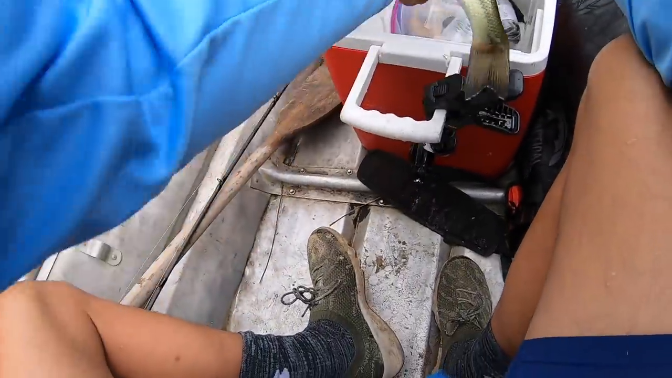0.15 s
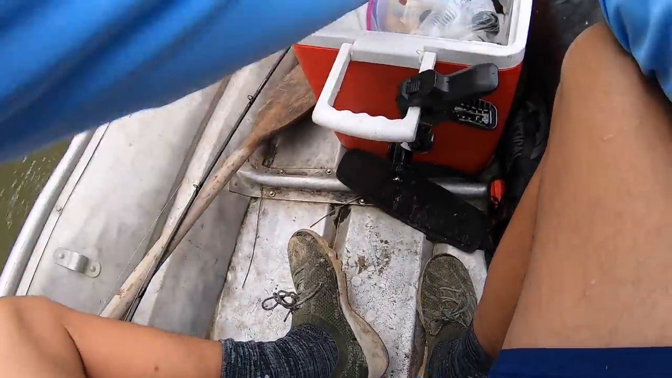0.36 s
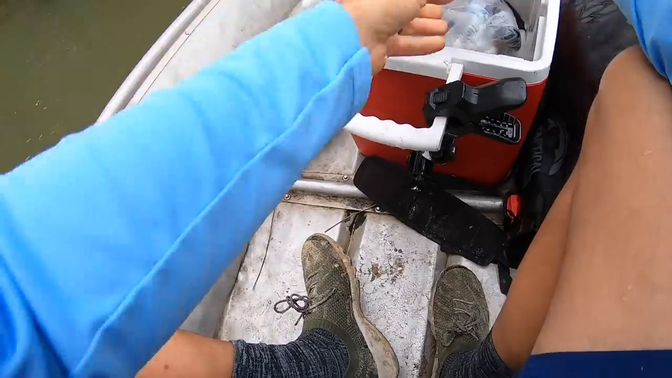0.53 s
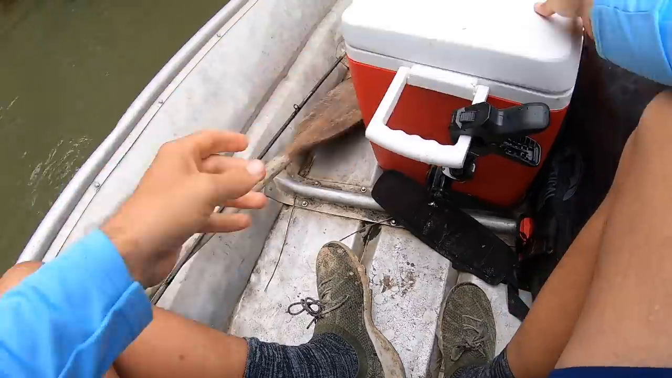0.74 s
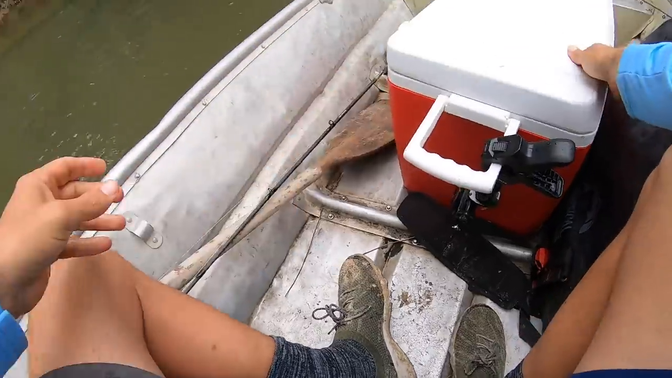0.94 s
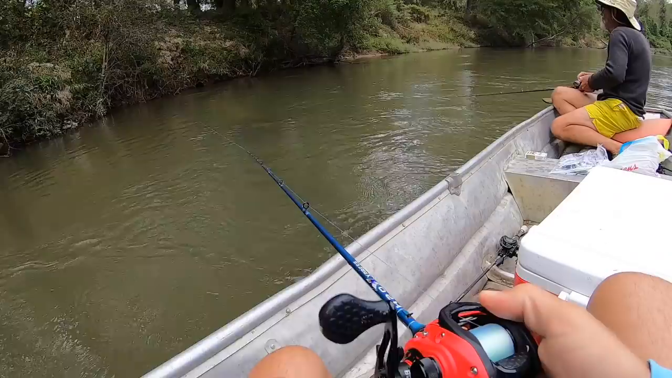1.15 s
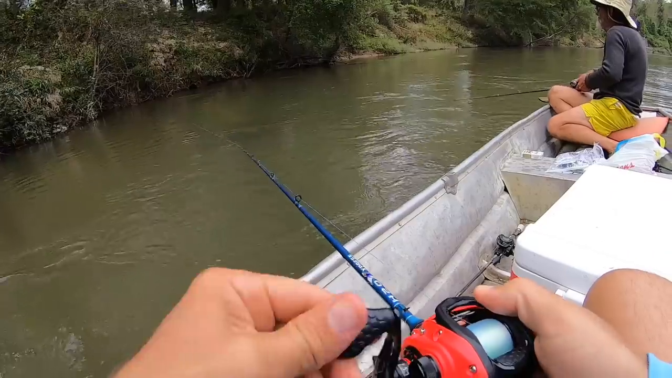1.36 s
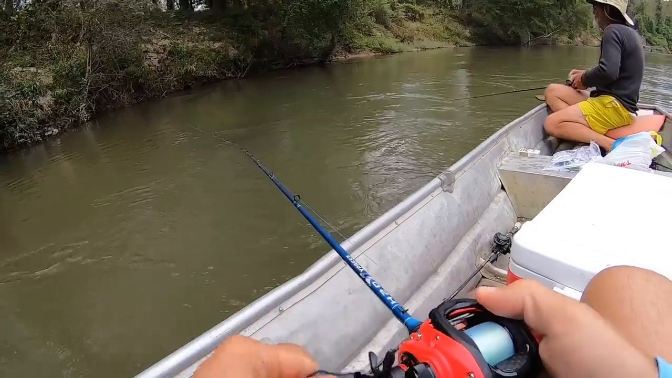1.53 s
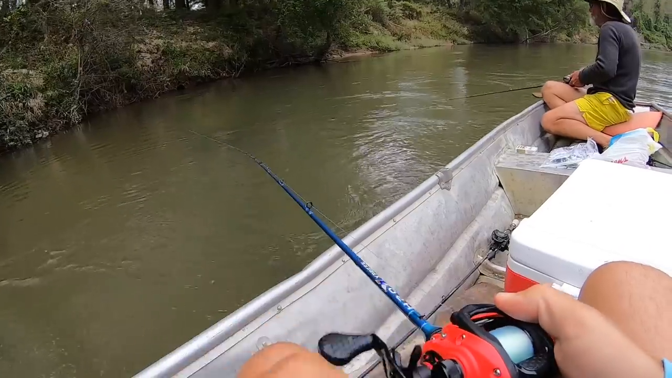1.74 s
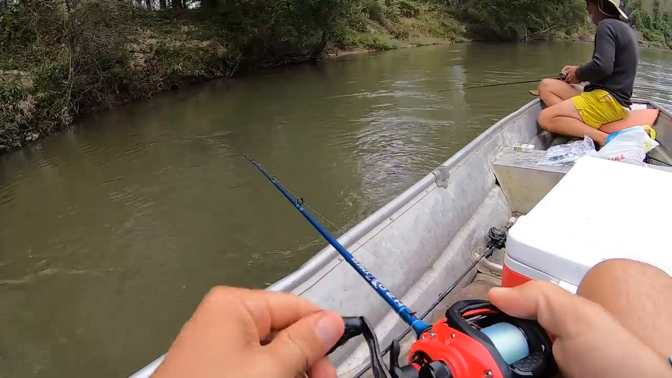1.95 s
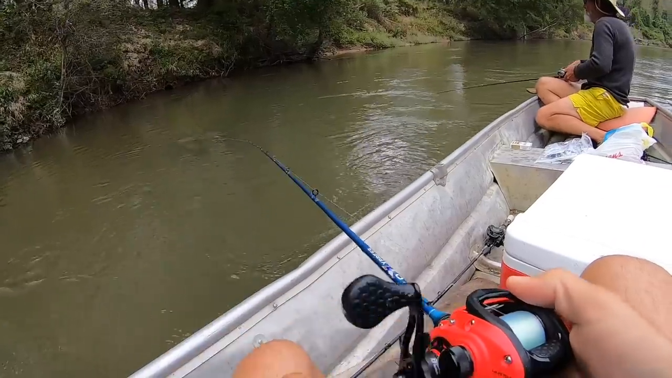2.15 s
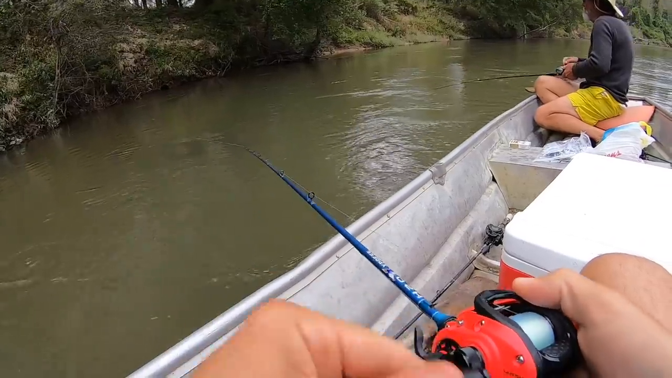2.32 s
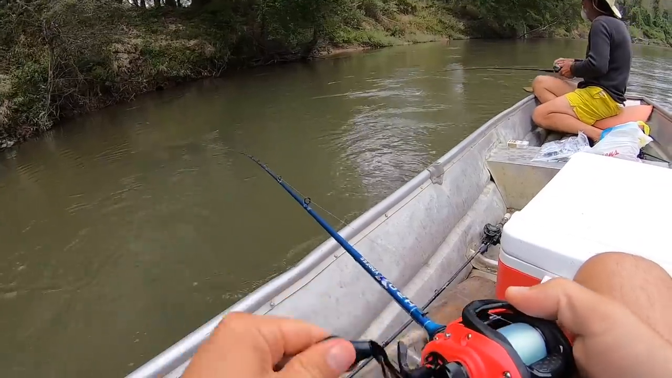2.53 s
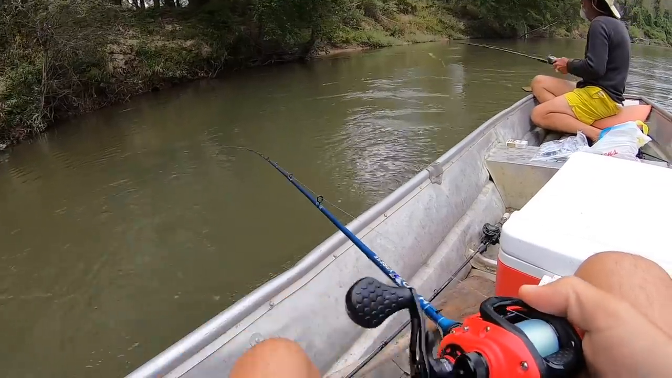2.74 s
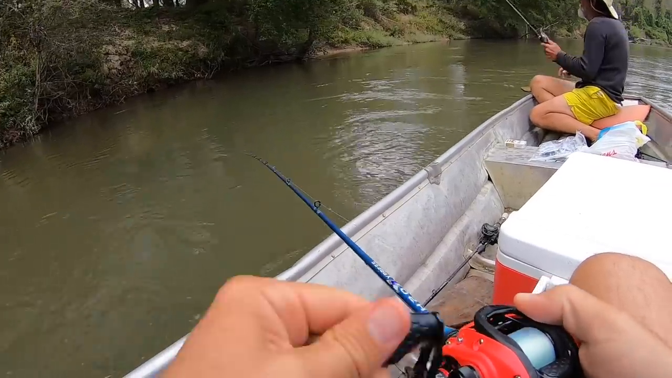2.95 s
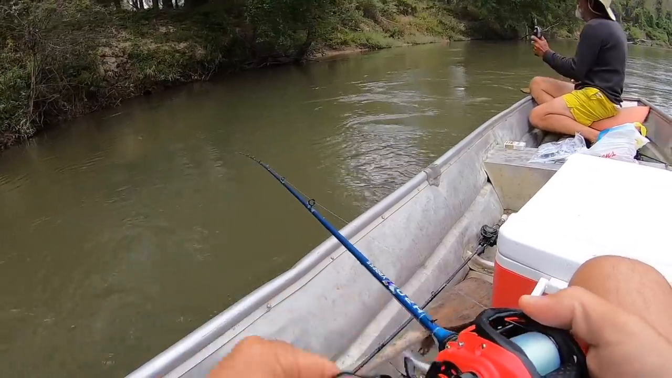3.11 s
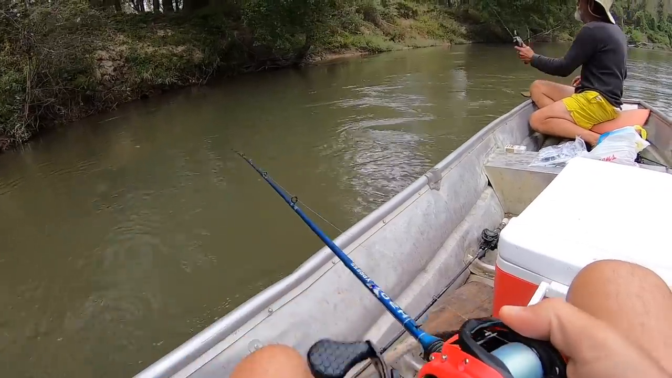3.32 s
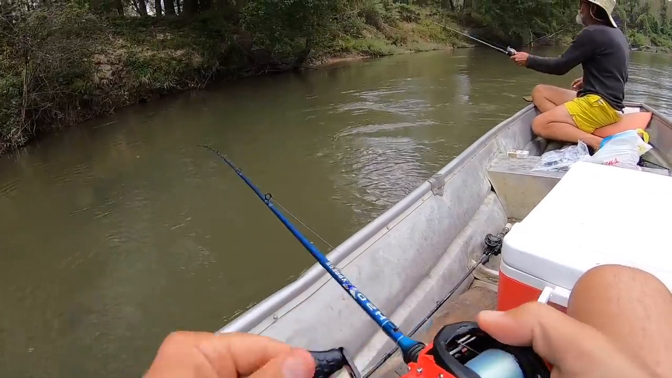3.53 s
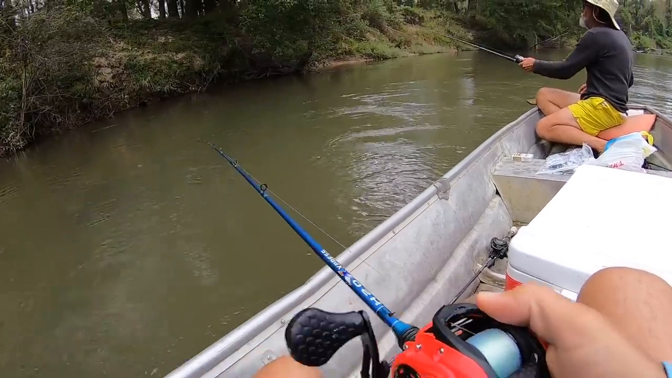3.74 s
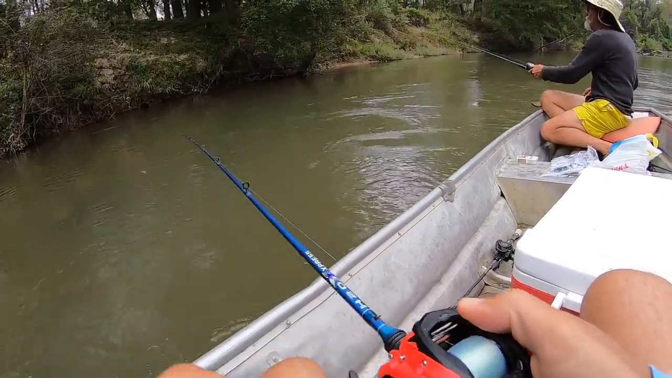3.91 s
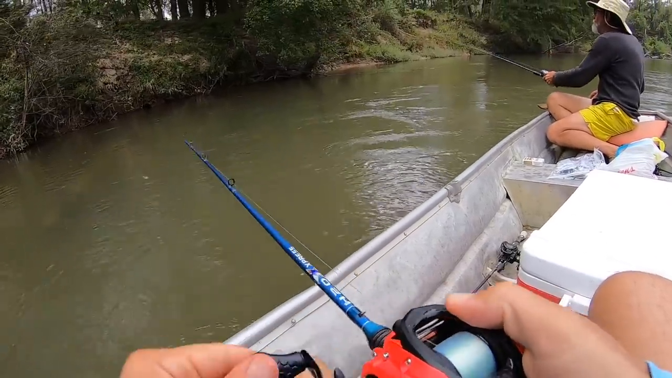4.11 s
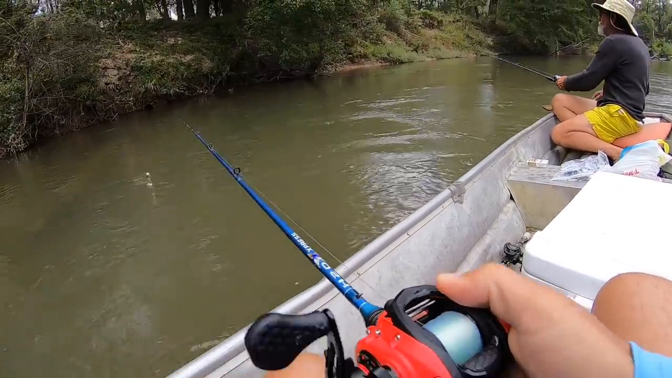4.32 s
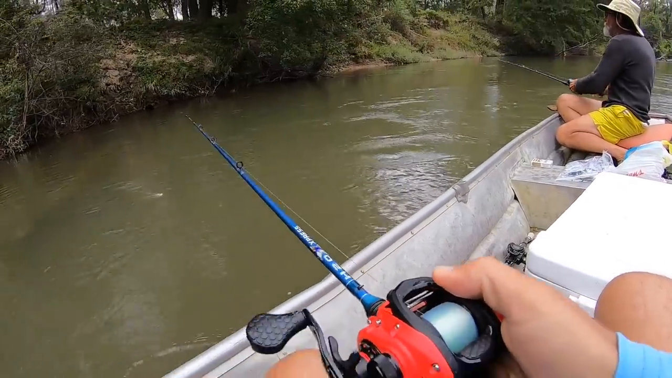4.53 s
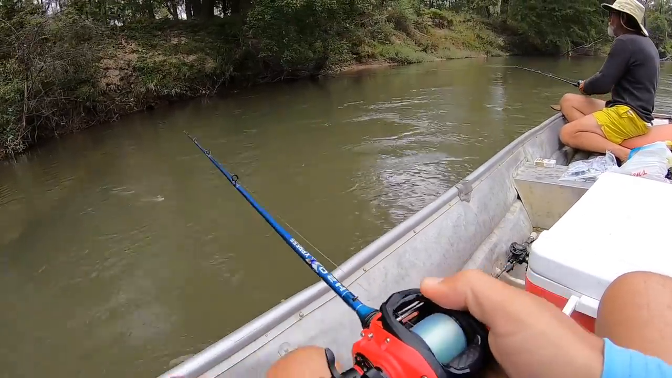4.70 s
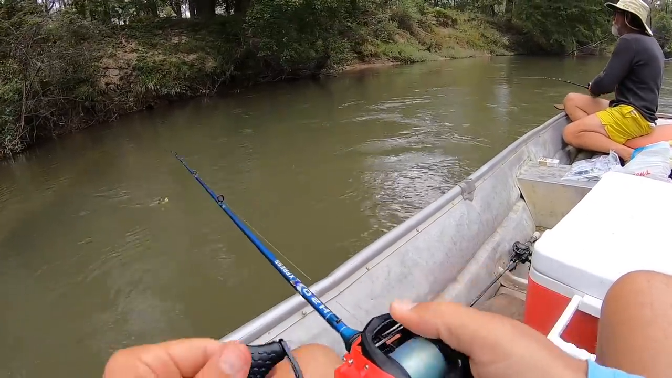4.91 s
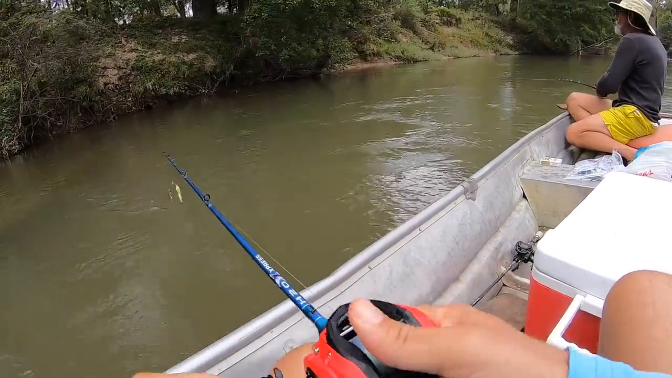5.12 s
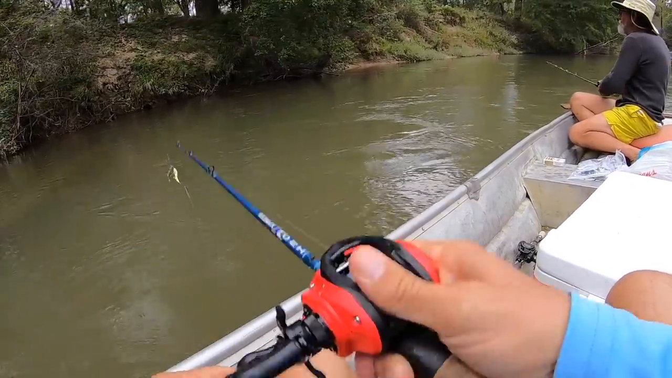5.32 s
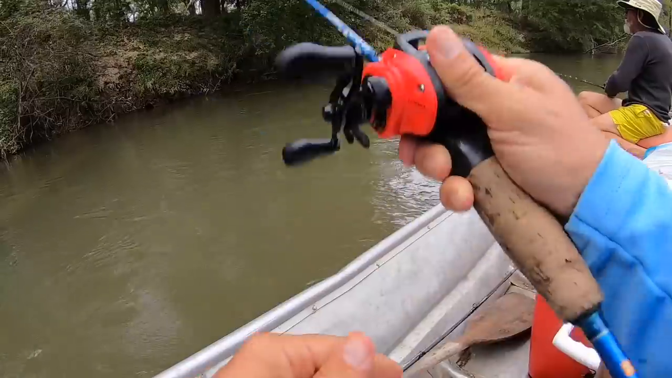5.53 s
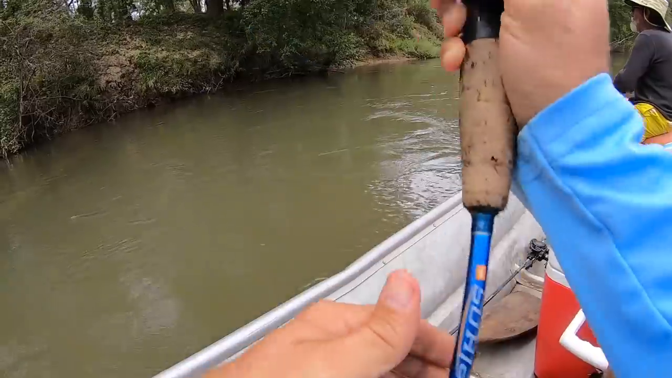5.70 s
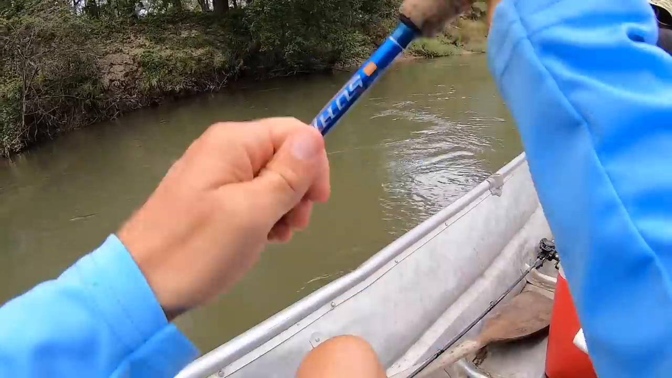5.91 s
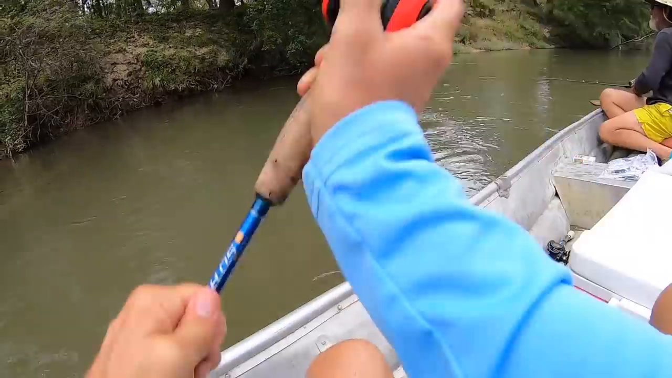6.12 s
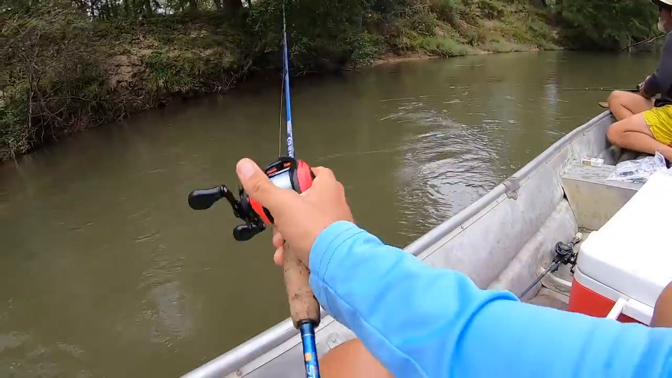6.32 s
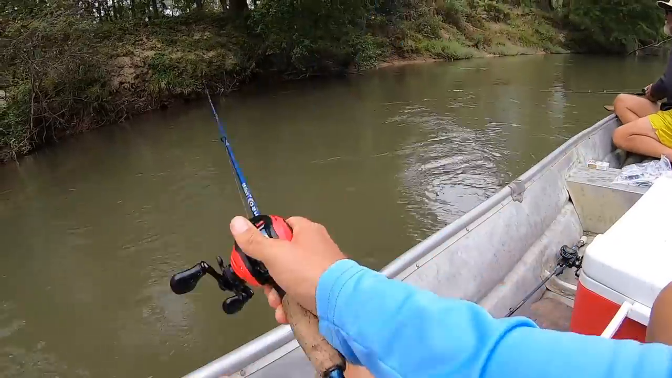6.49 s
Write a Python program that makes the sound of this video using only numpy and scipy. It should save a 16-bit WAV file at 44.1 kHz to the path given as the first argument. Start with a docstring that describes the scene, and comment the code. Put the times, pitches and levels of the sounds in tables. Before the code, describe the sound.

Close to the microphone in a small metal boat, a hollow cooler is bumped, then pounded in a loud, low, rattling flurry with crunching ice. It cuts off abruptly. Quiet outdoor air follows: a soft reel whirr with small ticks, a throbbing shrill insect, faint hum and low drone. Little drips come off the lure, then a sharp reel click, cloth swishes and low wind buffets.

```python
"""Fish in a cooler, then a fishing reel

A fish thrashes in a plastic cooler in a small metal boat: dying tones ring the box, noise bursts are its load.
The scene cuts from the cooler to an angler winding a reel of coloured noise, ticks and small metal rings.
The lure drips gliding sines, cloth swishes as swelling noise, and an insect buzzes as throbbing noise.
Behind them lie wind, air and far insects made of noise, with a thin hum and a low drone made of sines.
"""
import sys
import numpy as np
from scipy import signal
from scipy.fft import rfft, irfft, next_fast_len
from scipy.io import wavfile
from scipy.ndimage import uniform_filter1d

SR = 44100
rng = np.random.default_rng(int(sys.argv[2]) if len(sys.argv) > 2 else 0)


def dump_mix(stems):
    """Bounce the given channels to the path in sys.argv[1] as a 16-bit WAV at rate SR."""
    frames = np.atleast_2d(stems).T  # one column per channel
    limited = np.clip(frames, -1, 1)  # hard clip at full scale
    pcm = np.round(limited * 32767).astype(np.int16)
    wavfile.write(sys.argv[1], SR, pcm)


N = 289075  # length of the sound [samples]


def amp(db):
    """Turns decibels into a gain."""
    return 10 ** (np.asarray(db) / 20)


def evened(x):
    """Scales a signal to an average strength (rms) of 1."""
    return x / np.sqrt(np.mean(x ** 2) + 1e-20)


def smoothed_noise(count, size):
    """Noise averaged over `size` samples so that it changes more slowly, with rms 1."""
    return evened(uniform_filter1d(rng.standard_normal(count), size=size))


def wander(size):
    """A slow random curve with rms 1, smoothed twice."""
    return evened(uniform_filter1d(uniform_filter1d(rng.standard_normal(N), size=size), size=size))


def read(points, hz):
    """Reads a curve between its points, along a logarithmic frequency axis."""
    point_hz, value = np.transpose(points)
    return np.interp(np.log(hz + 1), np.log(point_hz + 1), value)


def level(rows, index=1):
    """Gain of one column of a level curve at every sample, all but silent outside its times."""
    rows = np.array(rows)
    return amp(np.interp(np.arange(N) / SR, rows[:, 0], rows[:, index], left=-150, right=-150))


def add(mix, s, sound, pan_db):
    """Adds a sound at time s; a positive pan makes the left side louder."""
    part = mix[:, round(s * SR):][:, :sound.shape[-1]]
    sides = amp([[pan_db / 2], [-pan_db / 2]])
    part += (sides * sound)[:, :part.shape[1]]


def hiss(spectrum, same, patchy_db, size=1024):
    """Stereo noise of a given colour and left-right likeness, with patches that get louder and softer."""
    frames, hz = 4 * N // size + 5, np.fft.rfftfreq(size, 1 / SR)
    a, b, c, d, patches = rng.standard_normal((frames, len(hz), 5)).T
    patches = uniform_filter1d(patches, size=9, axis=0)
    patches = evened(uniform_filter1d(patches, size=9, axis=1))
    same = np.clip(read(same, hz), -1, 1)[:, None]
    left = a + 1j * b
    right = same * left + np.sqrt(1 - same ** 2) * (c + 1j * d)
    z = np.array([left, right])
    z *= amp(read(spectrum, hz)[:, None] + patchy_db * patches)
    return evened(signal.istft(z, nperseg=size, noverlap=3 * size // 4)[1][:, :N])


def resonate(x, hz, width):
    """One resonance with a gain of about 1 at its centre; a wider one dies sooner."""
    r = np.exp(-np.pi * width / SR)
    return 2 * signal.lfilter([1 - r], [1, -r * np.exp(2j * np.pi * hz / SR)], x).real


def ring(modes, rise_ms, size):
    """Adds up dying tones of a struck object; they swell in while the contact lasts."""
    t = np.arange(size) / SR
    tones = sum(amp(db - 60 * t / t60) * np.sin(2 * np.pi * (hz * t + rng.random()))  # random phase
                for hz, db, t60 in modes)
    tones = tones * np.sin(np.pi / 2 * np.minimum(1000 * t / max(rise_ms, .1), 1)) ** 2
    return tones / np.linalg.norm(tones) * np.sqrt(SR / 100)  # total energy as of 10 ms at rms 1


def knocks(rows, broad, rise_ms, share, width, tail_db):
    """Gritty bursts of broad noise plus a ringing band: a smooth rise, a short crack, a longer tail."""
    size = 7000
    out, t = np.zeros((2, N)), np.arange(size) / SR
    white = rng.standard_normal(N + size)
    grains = amp(1.5 * smoothed_noise(N + size, size=70))  # many small contacts
    dull = signal.lfilter(*signal.butter(2, 3500, fs=SR), broad)
    share = np.clip(share, 0, 1)
    rise = np.sin(np.pi / 2 * np.minimum(1000 * t / rise_ms, 1)) ** 2
    for s, db, hz, pan_db, t60, treble_db in rows:
        here = slice(round(s * SR), round(s * SR) + size)
        loose = dull[:, here] + amp(treble_db) * (broad - dull)[:, here]
        band = resonate(resonate(white[here], hz, width * hz), hz, width * hz)
        band = evened(band)[:loose.shape[1]]
        after = np.maximum(t - rise_ms / 1000, 0) / max(t60, .003)
        crack, tail = amp(-170 * after), amp(tail_db - 60 * after)
        shape = rise * (crack + tail) * amp(db) * grains[here]
        add(out, s, (share * loose + (1 - share) * band) * shape[:len(band)], pan_db)
    return out


# gusts on the microphones: (time [s], level [dB], left-right difference [dB])
WIND = [(0, -53, -2), (1.2, -59, 2), (1.75, -72, 0), (2.1, -66, 0), (2.75, -56.5, -1), (3.3, -66, 0),
        (3.98, -54, 1), (4.4, -59.5, -1), (4.85, -63, 0), (4.92, -47, -15), (5.01, -37.5, 20),
        (5.07, -47.5, 12.5), (5.23, -43.5, 1.5), (5.6, -69.5, -1), (5.67, -47, 7), (5.75, -51, -3),
        (5.831, -39, 15), (5.99, -36, 13), (6.05, -45.5, 4), (6.3, -47.5, 4), (6.41, -55, 1),
        (6.55, -49, 4)]
# colour of the deep buffeting: (frequency [Hz], level [dB per Hz])
BUFFET = [(7.1, -59), (12, -27), (33, 6), (54, 1.5), (118, -14.5), (160, -20.5), (210, -79), (350, -120)]
# colour of the upper wind rumble: (frequency [Hz], level [dB per Hz])
RUMBLE = [(41, -43), (70, -13), (91, -2.5), (173, -6.5), (238, -16), (274, -9), (303, -11.5), (500, -18.5),
          (650, -24), (1100, -120)]
# left-right likeness of broad noises: (frequency [Hz], likeness [-1 to 1])
SAME = [(60, 1), (130, 0.96), (290, 0.68), (640, 0.19), (1410, -0.32), (3100, 0.69), (6820, -0.16),
        (15000, -0.17)]


def wind():
    """Moving air buffets the microphones in lumps; an upper rumble follows the gusts a little."""
    s, gust_db, pan_db = np.transpose(WIND)
    gust_db, pan_db = (np.interp(np.arange(N) / SR, s, v) for v in (gust_db, pan_db))
    buffet_db = gust_db + wander(size=2500) + pan_db * [[.5], [-.5]]
    buffet = amp(buffet_db) * hiss(BUFFET, [(20, 0.33), (50, 0.697), (100, 0.97)], 2.3, size=4096)
    rumble_db = -61.5 + 0.061 * (gust_db - gust_db.mean()) + 2 * wander(size=2000)
    return buffet + amp(rumble_db) * hiss(RUMBLE, SAME, 2.7, size=2048)


# a thin hum: (time [s], level [dB])
HUM = [(0, -64), (.45, -80), (1.3, -72), (1.4, -69), (1.8, -67), (1.95, -72.5), (2.55, -66.5), (2.82, -77),
       (2.95, -65.5), (3.62, -61.5), (4.3, -68.5), (4.45, -76), (4.68, -60), (5.09, -63.5), (5.2, -75.5),
       (5.77, -66.5), (6.0, -86), (6.4, -84), (6.55, -59.5)]
HUM_HZ, HUM_WAVER_HZ, HUM_WAVER_DB = 273.8, .7, 0.9  # wavers are rms


def thin_hum():
    """One sine whose pitch and level waver slowly."""
    strength = level(HUM) * amp(HUM_WAVER_DB * wander(size=2500))
    turns = np.cumsum(HUM_HZ + HUM_WAVER_HZ * wander(size=8000)) / SR
    return strength * np.sqrt(2) * np.sin(2 * np.pi * turns)


# a low wavering drone: (time [s], level [dB])
DRONE = [(1.2, -50), (1.56, -68), (1.75, -73), (2.07, -54), (2.22, -74), (2.54, -50), (2.8, -50.5),
         (2.86, -65), (2.92, -54), (3.62, -57.5), (3.9, -57.5), (4.31, -59), (4.38, -82), (4.65, -58),
         (4.75, -73)]
DRONE_HZ, DRONE_WAVER_HZ = 62.4, 1.82  # waver is rms


def low_drone():
    """A wavering low sine with weaker tones at two and three times its pitch."""
    turns = np.cumsum(DRONE_HZ + DRONE_WAVER_HZ * wander(size=5000)) / SR
    partials = sum(amp(db) * np.sin(2 * np.pi * (k + 1) * turns) for k, db in enumerate((0, -14.5, -17)))
    return level(DRONE) * np.sqrt(2) * partials


FAR_SONG_HZ, FAR_SONG_WIDTH_HZ, FAR_SONG_DB = 8540, 800, -83  # the width is that of each resonance


def far_insects():
    """A steady shrill band from the trees: noise sent twice through one resonance."""
    song = []
    for noise in rng.standard_normal((2, N)):
        once = resonate(noise, FAR_SONG_HZ, FAR_SONG_WIDTH_HZ)
        song.append(evened(resonate(once, FAR_SONG_HZ, FAR_SONG_WIDTH_HZ)))
    return amp(FAR_SONG_DB) * np.array(song)


# colour of the quiet air: (frequency [Hz], level [dB per Hz])
AIR = [(120, -4.5), (200, -7.5), (270, -3.5), (414, -35), (755, -5), (840, -12), (2430, -18), (4360, -24),
       (4680, -24.5), (6000, -24), (9020, -19.5), (12200, -25.5), (13800, -27.5)]


def air():
    """A soft noise that stays at one average level."""
    return amp(-63) * hiss(AIR, SAME, 1.3)


# stretches of throbbing insect song, each a list of: (time [s], level before the throb [dB])
BUZZ = [
    [(1.15, -65), (1.24, -59.5), (1.4, -61), (3.03, -58.5), (3.31, -58), (4.02, -58.5), (4.27, -65.5),
     (4.45, -68)],
    [(6.35, -66), (6.55, -58)],
]
# lone chirps: (start time [s], peak level [dB])
CHIRPS = [(4.6795, -54), (4.7715, -53.5), (4.8605, -52.5), (4.981, -51), (5.2684, -58.5), (5.4535, -60),
          (5.5752, -60), (5.912, -57.5), (6.0394, -57.5), (6.132, -59)]
# colour of the wing noise: (frequency [Hz], level [dB per Hz])
WINGS = [(4120, -26), (7000, -19), (7660, -8), (8580, 2), (9380, -4), (10100, 3.5), (11200, -2),
         (11900, 2.5), (14000, -6.5)]
BUZZ_PER_S, BUZZ_PEAK_S = 34.75, 1.913  # average throb rate; time that lines up a peak, before drift


def insect():
    """Wing strokes open and close a shrill noise; single strokes also sound alone."""
    t = np.arange(N) / SR
    drift = 0.12 * smoothed_noise(N, size=1500)  # strokes come a little early or late
    turns = BUZZ_PER_S * (t - BUZZ_PEAK_S) + drift
    stroke = (.5 + .5 * np.cos(2 * np.pi * turns)) ** 0.37 + 0.16
    gate = sum(level(part) for part in BUZZ) * stroke
    for s, db in CHIRPS:
        u = np.maximum(t - s, 0) / 0.007  # peaks 7 ms after its start
        gate += amp(db) * (u * np.exp(1 - u)) ** 2
    return gate * amp([[-.8], [.8]]) * hiss(WINGS, [(7000, 0.079), (15000, 0)], 3.2, size=512)


# sleeves, line and spray swish past: (time of peak [s], level before colouring [dB], rise [s], fall [s],
# tilt [about dB per octave], left-right difference [dB], stressed pitch [about Hz], stress [dB])
SWISHES = [(3.1, -57, 0.053, 0.074, 2, -4, 3000, 1), (3.45, -53.5, 0.081, 0.059, 5, 1, 3540, 5.5),
           (3.76, -57, 0.086, 0.13, 3.5, -3, 4560, 1), (4.332, -53, 0.012, 0.066, 4.5, 2, 3520, 2),
           (4.41, -71.5, 0.035, 0.035, -8, -1, 3500, 31.5), (4.565, -64, 0.037, 0.031, -5, 2.5, 3420, 10),
           (5.35, -46, 0.018, 0.036, 1, -1, 2390, 0), (5.8, -66.5, 0.15, 0.32, 5, -3, 1820, 12),
           (6.245, -49, 0.045, 0.057, 6, 1.5, 2580, 8.5), (6.4, -60, 0.049, 0.056, 2, 3, 2460, 17.5),
           (6.52, -63, 0.046, 0.12, 3, 2, 2460, 16)]
# basic colour of the swishes: (frequency [Hz], level [dB per Hz])
CLOTH = [(290, -31), (500, 8.5), (1290, 2), (1570, -2.5), (1750, -2), (2340, -3.5), (3170, -4.5),
         (9180, -10.5), (13500, -29)]


def swishes():
    """Grainy noise that swells and fades, duller or brighter each time."""
    t, out = np.arange(N) / SR, np.zeros((2, N))
    size = next_fast_len(N)
    flutter = amp(2.06 * smoothed_noise(N, size=150))  # folds rub in small grains
    cloth = rfft(flutter * hiss(CLOTH, [(600, .3), (9000, .1)], 2.0, size=512), size)
    octaves = np.log2(np.fft.rfftfreq(size, 1 / SR) / 3000 + 0.14)
    for s, db, rise, fall, tilt_db, pan_db, hz, stress_db in SWISHES:
        bump = np.exp(-((octaves - np.log2(hz / 3000 + 0.056)) / 0.37) ** 2)
        colour = amp(tilt_db * octaves + stress_db * bump)
        swell = np.exp(-((t - s) / np.where(t < s, rise, fall)) ** 2)
        add(out, 0, amp(db) * swell * irfft(cloth * colour, size)[:, :N], pan_db)
    return out


# bubbles from the lure's drops: (time [s], level [dB], starting pitch [Hz], length [s],
# pitch at the end as a multiple of the start)
DROPS = [(4.202, -54.5, 1140, 0.024, 2.1), (4.258, -52, 1860, 0.016, 0.94), (4.259, -53, 2830, 0.011, 1.06),
         (4.295, -50.5, 3080, 0.0067, 0.88), (4.329, -45.5, 3800, 0.018, 0.91),
         (4.347, -52, 3400, 0.021, 0.79), (4.351, -53, 1365, 0.031, 1.1), (4.367, -50.5, 689, 0.031, 1.05),
         (4.397, -36, 3020, 0.0063, 1.55), (4.398, -49, 875, 0.035, 1.09), (4.406, -51, 2180, 0.0093, 0.94),
         (4.455, -55, 3020, 0.01, 0.92), (4.5, -54.5, 3350, 0.0088, 1.03), (4.53, -58, 1520, 0.015, 0.92),
         (4.554, -46.5, 3270, 0.0094, 1.03), (4.559, -50.5, 618, 0.075, 0.96),
         (4.561, -58, 3600, 0.016, 0.83), (4.606, -56, 1740, 0.017, 1.9), (4.634, -60, 2900, 0.013, 1.3),
         (5.881, -62, 780, 0.019, 1.2)]


def drips():
    """Each bubble is a short, slightly ragged sine that swells, glides up or down and dies."""
    out = np.zeros((2, N))
    ragged = smoothed_noise(N, size=120)
    for s, db, hz, length, glide in DROPS:
        u = np.arange(0, length, 1 / SR) / length  # progress from 0 to 1
        wobble = ragged[round(s * SR):][:len(u)]
        turns = np.cumsum(hz * glide ** (u ** 1.35) * (1 + 0.056 * wobble)) / SR
        swell = amp(db + 1.5 * wobble[::-1]) * np.sin(np.pi * u ** .45)
        add(out, s, swell * np.sin(2 * np.pi * turns), .6)
    return out


# spool and gears: (time [s], whirr level [dB], line hiss level [dB])
WHIRR = [(1.18, -54.5, -59), (1.7, -55, -62), (2.02, -56.5, -64.5), (2.63, -57, -63.5), (2.83, -59, -62.5),
         (3.06, -56.5, -72.5), (3.5, -53, -59.5), (3.84, -56, -68), (4.04, -59.5, -69), (4.43, -61.5, -60),
         (4.56, -79, -68), (4.81, -65.5, -66.5), (5.05, -75, -68.5), (5.8, -86.5, -70),
         (6.06, -61.5, -64.5), (6.25, -56.5, -54), (6.55, -65.5, -61)]
# colour of the gear whirr: (frequency [Hz], level [dB per Hz])
GEARS = [(210, -1), (350, -5), (585, -9), (700, 3), (859, 1.5), (1350, -1.5), (1760, 4), (2110, -6),
         (2830, -7), (3850, -18), (4910, -12), (6030, -15), (7500, -21), (9750, -45), (16500, -120)]
# colour of the line hiss: (frequency [Hz], level [dB per Hz])
LINE = [(1180, -20.5), (2000, -5.5), (2120, -6), (2280, -4), (2830, -6.5), (3900, -9.5), (4830, -10),
        (6570, -12), (9000, -7), (11700, -22), (19800, -120)]
# ticks of the reel, rod and line: (time [s], level [dB], ring pitch [Hz], left-right difference [dB],
# time to die by 60 dB [s], treble of the broad snap [dB])
TICKS = [(1.3964, -55, 2320, 8, 0.028, 2), (2.5973, -59, 2800, -2, 0.025, 9),
         (2.7194, -38, 4220, -4, 0.056, 5), (2.9113, -53, 8760, -5, .03, -8),
         (3.069, -52, 2190, -4, .03, -3), (3.1579, -56, 9400, 1, .03, 1), (3.304, -44, 9800, -7, .02, -13),
         (3.3047, -42, 3380, -5, 0.042, -5), (3.491, -50, 9200, -13, 0.022, -3),
         (3.689, -59, 2590, -6, .03, 4.5), (3.758, -57, 2030, -13, 0.02, 5),
         (4.1064, -56, 1970, -6, 0.032, -4), (4.261, -52, 2800, 3, .02, -10),
         (4.86, -63, 4500, -5, .026, 3), (4.981, -56.5, 2170, -4, 0.038, -14),
         (5.204, -51.5, 2760, -7, .028, 0.5), (5.221, -50, 5040, -5, 0.035, 5),
         (5.2465, -42, 4370, -5, 0.07, 0.5), (5.3158, -51, 2040, -2, .04, -5),
         (5.335, -45.5, 2420, 0, .06, -5), (5.36, -26.5, 7660, -9, 0.017, 5.5),
         (5.443, -62, 2510, -4, 0.036, 3), (5.5518, -60.5, 3940, -2, 0.041, -7),
         (5.6283, -58.5, 2620, -5, 0.073, 2.5), (5.739, -56.5, 2060, 5, .03, 1.5),
         (5.769, -49, 3380, -2.5, 0.024, -0.5), (5.8576, -63, 2810, -5, .03, 1),
         (5.9355, -49, 2040, 0, 0.024, -4.5), (5.9975, -42, 5460, 3, 0.012, -0.5),
         (6.4144, -50, 7300, -.6, .03, -1)]
# colour of the broad snap in a tick: (frequency [Hz], level [dB per Hz])
SNAP = [(290, -50), (500, -16), (1670, -5), (2200, -5.5), (3190, -2.5), (3530, -9), (4440, -2),
        (6180, -9.5), (10500, -10.5), (15500, -40)]
# tones of the reel housing under the latch: (pitch [Hz], relative level [dB], time to die by 60 dB [s])
HOUSING = [(476, -2.5, 0.0051), (689, -6, 0.03), (894, -3.5, 0.014), (1176, -3.5, .01),
           (1694, -12.5, 0.027), (2250, -4.5, 0.021), (2460, 8, 0.011), (2830, -5, 0.015),
           (3400, -0.5, 0.0085), (4260, -3, 0.0085), (5370, -0.5, 0.01), (6100, -8, 0.01),
           (7900, -6, 0.011), (9250, -5, 0.016), (10600, -16, 0.0063)]
# small pings of metal parts: (time [s], level [dB], pitch [Hz], time to die by 60 dB [s])
PINGS = [(2.776, -60, 9050, .13), (3.16, -53, 9180, 0.15), (3.331, -69, 8900, 0.13),
         (5.405, -60.5, 970, 0.1), (6.335, -58, 9000, 0.075), (6.418, -62, 7300, 0.05)]
LATCH_S, LATCH_DB, LATCH_PAN_DB = 5.359, -23.5, -7  # the reel's latch snaps over


def reel():
    """Gears whirr and line hisses as noise; parts tick and ping, and the latch rings the housing."""
    out = level(WHIRR) * amp([[-2.5], [2.5]]) * hiss(GEARS, SAME, 1.5)
    out += level(WHIRR, index=2) * amp([[-1.5], [1.5]]) * hiss(LINE, SAME, 2.5, size=512)
    snap = hiss(SNAP, [(600, .9), (12000, .6)], 2.0, size=256)
    # share is that of the broad snap; width is a fraction of the ring pitch
    out += knocks(TICKS, snap, rise_ms=0.63, share=0.54, width=0.14, tail_db=1)
    add(out, LATCH_S, amp(LATCH_DB) * ring(HOUSING, 2.6, size=6000), LATCH_PAN_DB)
    for s, db, hz, t60 in PINGS:
        add(out, s, amp(db) * ring([(hz, 0, t60)], 1.5, size=9000), -1.5)
    return out


def hull(x):
    """Short reflections off the metal hull: a dying noise tail, different on each side."""
    tail = rng.standard_normal((2, 5000)) * amp(-60 * np.arange(5000) / SR / 0.067)
    tail[:, :60] = 0  # a short gap before the first reflection
    return signal.fftconvolve(x, tail / np.linalg.norm(tail[0]), axes=1)[:, :N]


# blows on the cooler walls: (time [s], level [dB], favoured pitch of the struck wall [Hz],
# spread [octaves], ring length [multiple])
BLOWS = [(.141, -43, 191, 0.3, 1.3), (.179, -45, 260, 1.5, 2.9), (0.329, -38, 158, 0.85, 2.9),
         (.497, -23, 119, 0.16, 4.9), (.542, -30.5, 200, 1.2, 2.1), (0.587, -23.5, 202, 1.6, 1.6),
         (.604, -17.5, 182, 1.3, 0.84), (.648, -17.5, 370, 0.48, 0.65), (.691, -7, 160, 0.91, 2),
         (0.711, -11, 173, 1.2, 0.55), (.716, -27.5, 650, 0.22, 0.4), (.775, -9.5, 207, 1.9, 0.8),
         (.783, -10, 107, 0.45, .4), (.8, -14.5, 148, 1.1, 0.41), (.827, -10.5, 181, 1.2, 0.29),
         (0.838, -14.5, 110, 1.34, 0.59), (.894, -13.5, 125, .22, 1.16), (.954, -24, 123, 0.36, 1),
         (.998, -23, 243, 1.3, 0.89), (1.041, -38, 149, .61, 1.2), (1.065, -45, 365, 0.26, 0.47),
         (1.122, -35.5, 396, 0.85, 0.61), (1.132, -21.5, 116, 0.16, 1.25)]
# the cooler's hollow tones before detuning: (pitch [Hz], relative level [dB],
# time to die by 60 dB before the blow's length multiple [s])
COOLER = [(70, 0.5, 0.22), (92.4, -44, 0.12), (122.5, 2, 0.14), (168.7, 0.5, 0.14), (195.5, -5.5, 0.12),
          (252.6, -6.5, 0.14), (351, -1.5, 0.13), (426, 3, 0.043), (481, -6, 0.13), (592, -17.5, 0.25),
          (668, -14, 0.2), (760, -12, 0.089), (863, -15.5, 0.13), (900, -17.5, 0.18), (1050, -6, 0.062)]
CONTACT_MS = 3.9  # for a spread of one octave; a softer, longer contact excites fewer tones


def blows():
    """Each blow rings the hollow box, loudest near the struck wall's own pitch."""
    out = np.zeros((2, N))
    all_bends = rng.standard_normal((len(BLOWS), len(COOLER)))
    for (s, db, wall_hz, spread, length), bends in zip(BLOWS, all_bends):
        modes = []
        for (hz, mode_db, t60), bend in zip(COOLER, bends):
            loss_db = 6 * abs(np.log2(hz / wall_hz) / spread) ** 1.3
            # the loaded wall detunes each tone a little
            modes.append((hz * (1 + 0.037 * bend), mode_db - loss_db, t60 * length))
        add(out, s, amp(db) * ring(modes, CONTACT_MS / spread ** 0.27, size=12000), -.2)
    return out


# ice and bottles knocked about: (time [s], level [dB], ring pitch [Hz], left-right difference [dB],
# time to die by 60 dB [s], treble of the broad crunch [dB])
RATTLES = [(.115, -63, 2910, 2, 0.14, -21), (.134, -42.5, 1840, -7, 0.11, 5.3),
           (.175, -33.5, 4800, -1.5, 0.11, 6), (.207, -48, 3180, 0, 0.12, -34),
           (.312, -65.5, 4850, -2, 0.25, 11.5), (.337, -58, 1240, 7, 0.13, 0),
           (.493, -55, 2730, 1, 0.11, 4.5), (.508, -58, 1300, 3, 0.35, 7), (.541, -55, 2420, 0, 0.13, 11.5),
           (.581, -41.5, 2500, -4, 0.19, 9), (.594, -30, 4160, 0, 0.047, 13),
           (.603, -26.5, 3450, -3, 0.035, 11), (.631, -40, 3240, 1, 0.44, -5),
           (.651, -23.5, 1290, -3.5, 0.043, -12), (.673, -28.5, 2430, -1, 0.16, 5.5),
           (.682, -26, 4200, -2, 0.034, 7), (.689, -26.5, 3400, -.6, 0.067, -25),
           (.711, -37, 2050, -3.5, 0.041, 12), (.734, -47, 1190, -4.5, 0.05, -5),
           (.76, -27.5, 2550, -1.5, 0.1, 1), (.771, -17, 3460, -4, 0.034, -23),
           (.793, -41, 1080, -9, 0.17, -17), (.829, -31, 1470, 1, 0.086, -5.5),
           (.876, -37, 5800, -0.5, 0.097, -0.5), (.895, -39.5, 2760, -4, .054, -12),
           (.941, -37.5, 2300, -5, 0.14, 10), (.983, -45, 1740, -9, 0.2, -28),
           (.998, -48, 2840, -3, .11, 2), (1.036, -54, 2310, -7, .061, -1),
           (1.119, -40.5, 2650, -4, 0.066, -20)]
# colour of the crunch: (frequency [Hz], level [dB per Hz])
CRUNCH = [(290, -6), (500, -11.5), (657, -0.5), (876, -10.5), (1310, -7.5), (1820, -9.5), (3630, -12),
          (6930, -16.5), (9240, -17.5), (15500, -40.5)]
# the load shifts: (time [s], dull rumble level [dB], fine crunch level [dB])
SLOSH = [(0.0, -57, -69), (0.38, -62, -62.5), (0.56, -39, -81), (0.628, -30, -46.5), (0.688, -28, -34.5),
         (0.762, -29, -45), (0.83, -19, -51), (0.87, -30, -56), (0.95, -38.5, -54), (1.024, -37, -60),
         (1.146, -51, -55), (1.19, -39, -64)]
COOLER_CUT_S = 1.188  # the cooler scene is cut off here


def cooler():
    """The thrashing fish: blows ring the box while its contents rattle, crunch and rumble."""
    out = blows()
    crunch = hiss(CRUNCH, [(600, .75), (3000, .8), (12000, .3)], 2.0, size=256)
    # share is that of the broad crunch; width is a fraction of the ring pitch
    out += knocks(RATTLES, crunch, rise_ms=2.86, share=0.47, width=0.28, tail_db=-0.5)
    out += level(SLOSH, index=2) * crunch
    # the dull rumble borrows the colour of the upper wind rumble
    out += level(SLOSH) * hiss(RUMBLE, [(60, .98), (400, .9)], 2.5, size=2048)
    return out * np.clip((COOLER_CUT_S - np.arange(N) / SR) / 0.003, 0, 1)  # 3 ms fade


def scene():
    """Everything in and around the boat."""
    background = wind() + thin_hum() + low_drone() + far_insects() + air()
    gear = drips() + reel()
    return background + insect() + swishes() + gear + amp(-23) * hull(gear) + cooler()


TREBLE_FADE_HZ, EDGE_HZ = 14400, 16500  # treble fades above the first; final upper limit


def record(dry):
    """Soft overload of loud peaks, a steep treble fade, then a steep upper limit."""
    squeezed = .75 * np.tanh(dry / .75)
    faded = signal.sosfilt(signal.butter(14, TREBLE_FADE_HZ, fs=SR, output="sos"), squeezed)
    limit = signal.firwin(511, EDGE_HZ, window=("kaiser", 9), fs=SR)
    return signal.oaconvolve(faded, limit[None], "same")


dry = scene()
out = record(dry)
dump_mix(out)
```